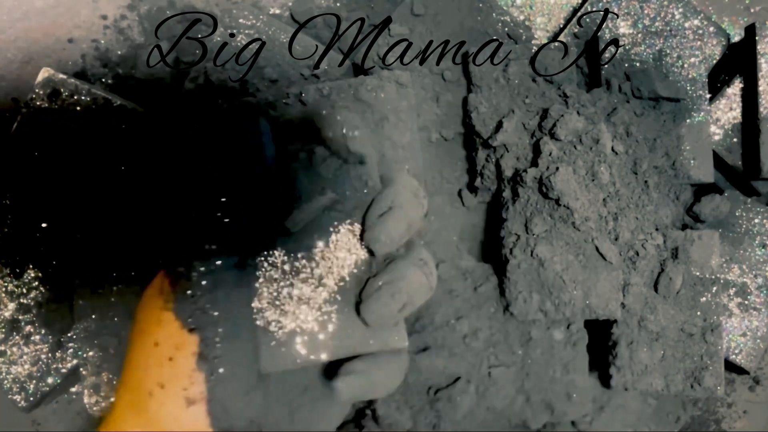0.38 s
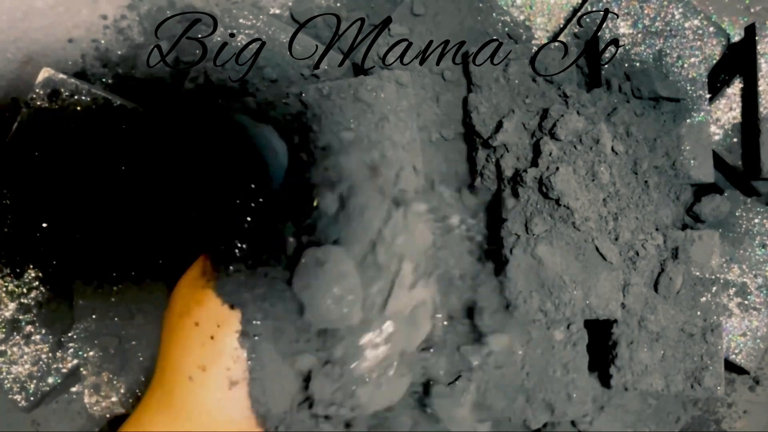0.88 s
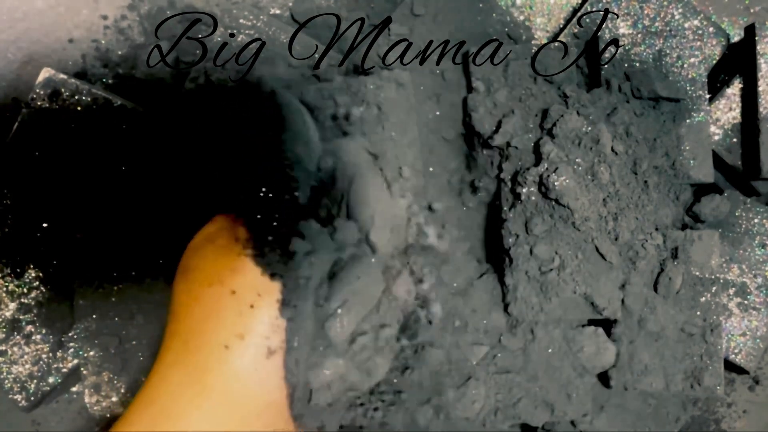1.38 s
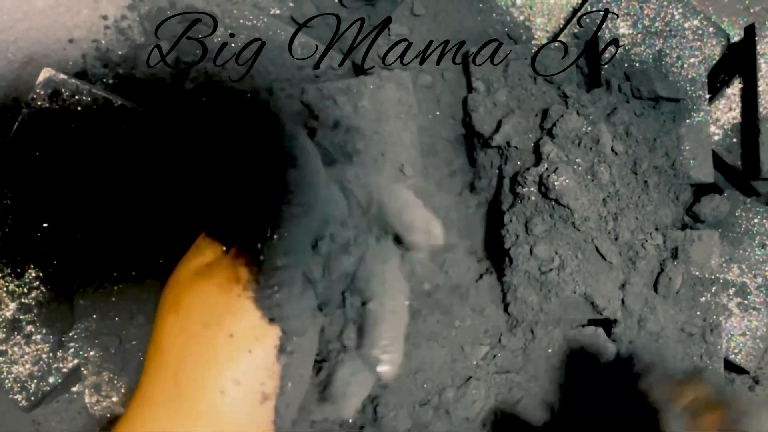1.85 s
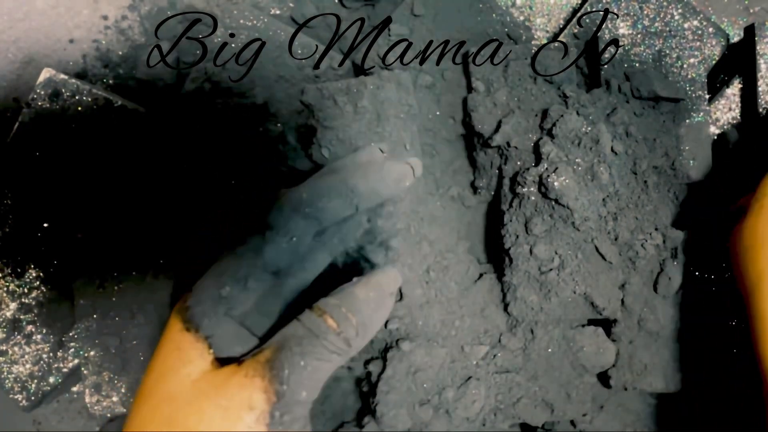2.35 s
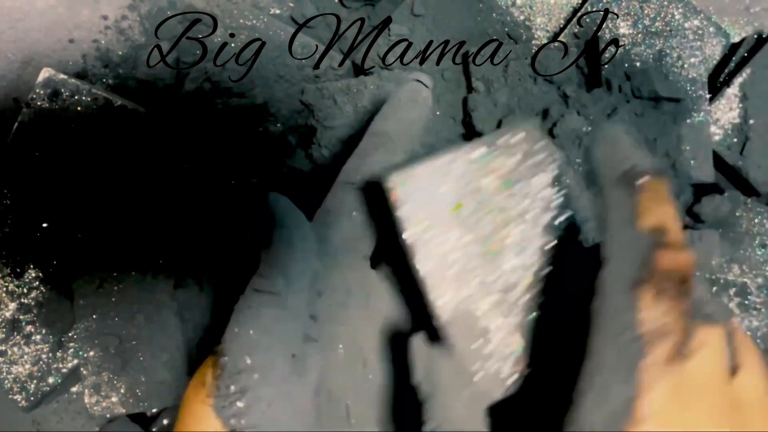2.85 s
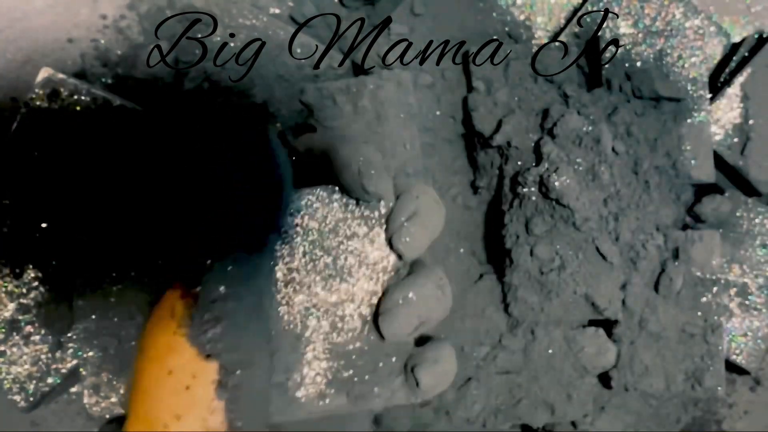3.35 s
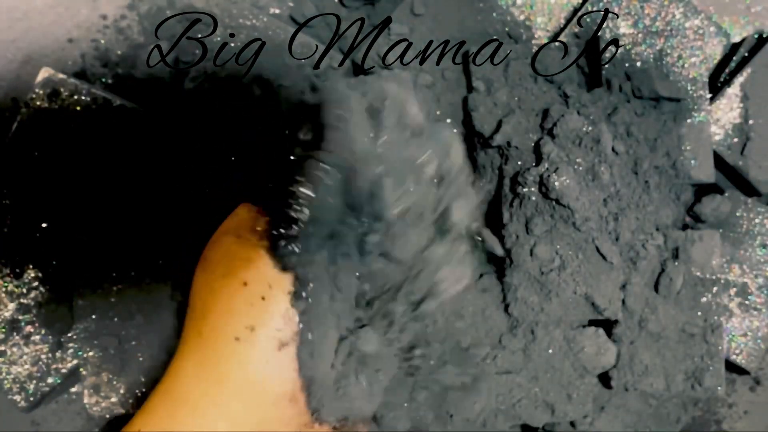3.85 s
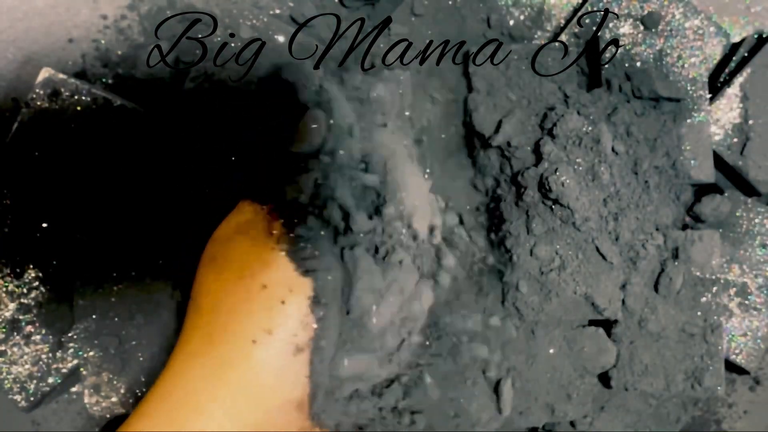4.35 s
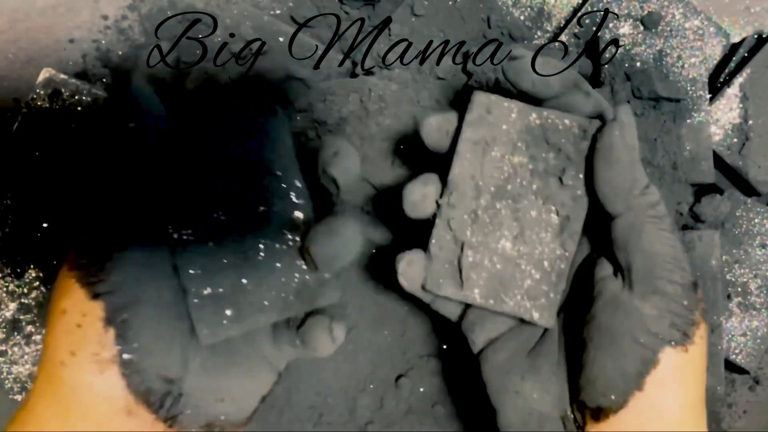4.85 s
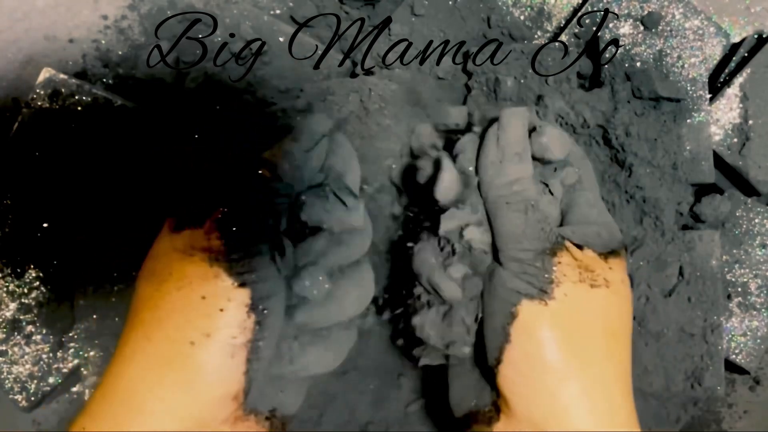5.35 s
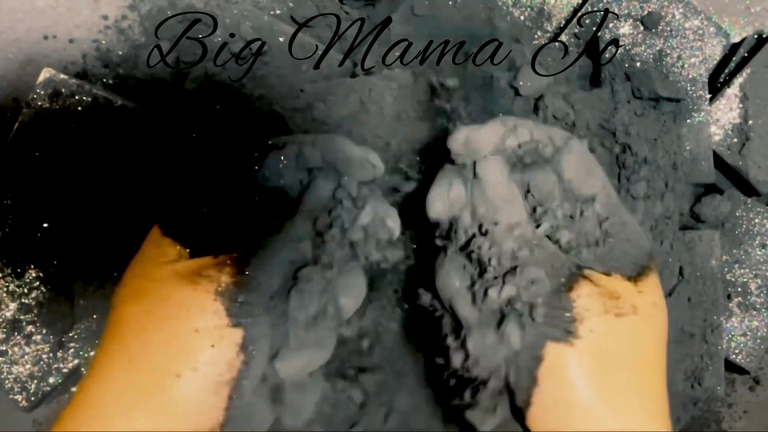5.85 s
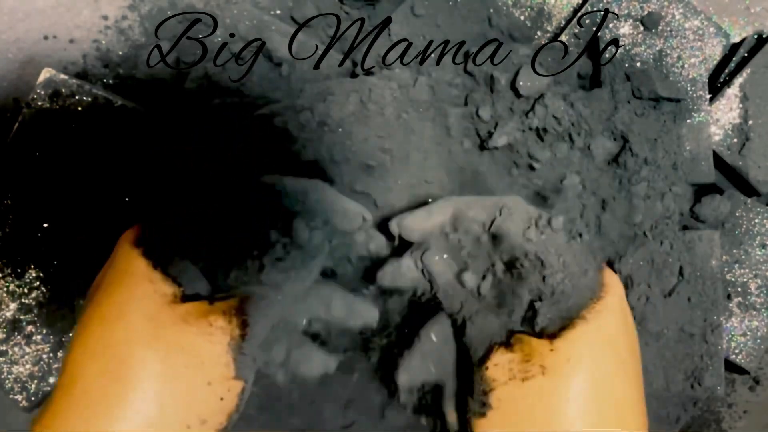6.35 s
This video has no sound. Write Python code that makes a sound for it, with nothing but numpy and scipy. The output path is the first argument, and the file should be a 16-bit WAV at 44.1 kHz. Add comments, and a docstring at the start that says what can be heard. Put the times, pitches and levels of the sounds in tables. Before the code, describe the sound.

Close, dry, single-channel sound of hands crushing powdery blocks over a tray, with faint steady hiss, a thin buzz and barely audible low shudder. Slight handling first, then at 0.3 s dull snaps and a scuff of shearing powder; crunches gather at 0.5-1.1 s with a soft thud at 0.85. Gritty kneading continues, with small snaps at 1.3 and 1.5 s, then thins out. A lone dull knock and thud fall at 2.4 s; skin rubs and squeaks faintly at 2.85. Crushing resumes at 3.26, with a loud crack and heavy tray thud at 3.42, then scattered snaps and crumbling until 4.45. The level drops abruptly at 4.76 and returns within a fraction of a second. From 5.0 s comes dense crackling and crunching, peaking with a hard bright crack at 5.81 and a dull snap at 5.9. A tiny squeak sounds at 6.2 before crumbs settle by 6.45.

```python
"""Dull snaps and dry crackling: hands crush soft powdery blocks over a tray, close to a small microphone.
Lumps ring for a few cycles, hard flakes crack, crumbs and grit crackle with the squeeze, the tray thuds.
Powder and skin rub as shaped noise, and a few grains squeak as short wavering tones.
The stand sways below hearing and shudders, and the electronics hiss and buzz faintly.
Once, the level drops suddenly and fades back in."""
import sys
import numpy as np
from scipy import signal
from scipy.fft import rfft, irfft, next_fast_len
from scipy.io import wavfile
from scipy.ndimage import uniform_filter1d

SR = 44100
rng = np.random.default_rng(int(sys.argv[2]) if len(sys.argv) > 2 else 0)


def to_wav(s):
    """Save 16-bit WAV."""
    ch = np.atleast_2d(s).T  # columns
    pcm = np.round(np.clip(ch, -1, 1) * 32767)  # PCM
    wavfile.write(sys.argv[1], SR, pcm.astype(np.int16))


def amplitude_ratio(level_db):
    """Convert a level in decibels to the matching linear amplitude (field) ratio."""
    exponent = np.asarray(level_db, float) / 20
    return 10 ** exponent


N = 284886  # samples in the scene

# how strongly crumbs of each pitch sound: pitch_hz, level_db (relative)
CRUMB_COLOUR = [(200, 1), (350, 3), (550, 4), (1000, 1.5), (1400, -10), (2200, -18), (4000, -31)]


def evened(x):
    """Scales a signal to an rms (average strength) of one."""
    return x / np.sqrt(np.mean(x ** 2) + 1e-20)


def read(points, hz):
    """Reads a level between the points of a spectrum table, along a log-frequency axis."""
    f, value = np.transpose(points)
    return np.interp(np.log(hz + 1), np.log(f + 1), value)


def curve(rows, column):
    """Turns one dB column of a timed table into a smooth gain for each sample."""
    rows = np.array(rows)
    return amplitude_ratio(np.interp(np.arange(N) / SR, rows[:, 0], rows[:, column]))


def noise(points):
    """Steady noise of unit rms with a given spectrum, silent outside the table."""
    size = next_fast_len(N)
    hz = np.fft.rfftfreq(size, 1 / SR)
    inside = (hz >= points[0][0]) & (hz <= points[-1][0])
    spectrum = rfft(rng.standard_normal(size)) * amplitude_ratio(read(points, hz)) * inside
    return evened(irfft(spectrum, size)[:N])


def ring(hz, t60, rise, phase=0):
    """A softly started tone that loses 60 dB in t60 seconds and stops there; phase is in turns."""
    t = np.arange(round(t60 * SR) + 2) / SR
    envelope = amplitude_ratio(-60 * t / t60) * (1 - np.exp(-t / rise))
    return envelope * np.sin(2 * np.pi * (hz * t + phase))


def stroke(db, rise, fall):
    """An envelope that swells in a straight line and dies away exponentially (times in s)."""
    t = np.arange(0, rise + 2 * fall, 1 / SR)
    return amplitude_ratio(db) * np.where(t < rise, t / rise, np.exp(-2 * (t - rise) / fall))


def add(mix, at, sound):
    """Mixes a sound in from sample at, cutting what runs past the end."""
    part = mix[at:][:len(sound)]
    part += sound[:len(part)]


def grains(colour, per_s, spread_db, cycles, clump_db, clump_s, count=24):
    """Small fractures at random, each a few cycles at one of count pitches, coming in clumps."""
    strength = amplitude_ratio(spread_db * np.minimum(rng.exponential(1, N), 4))
    strength *= rng.random(N) < per_s / SR
    drift = evened(uniform_filter1d(rng.standard_normal(N), round(clump_s * SR)))
    strength *= amplitude_ratio(clump_db * drift)
    kind = rng.integers(0, count, N)
    out = np.zeros(N)
    for k, hz in enumerate(np.geomspace(colour[0][0], colour[-1][0], count)):
        grain = ring(hz, cycles / hz, 0.17 / hz)[:2048]
        grain = amplitude_ratio(read(colour, hz)) * grain / np.linalg.norm(grain)
        out += signal.oaconvolve(strength * (kind == k), grain)[:N]
    return evened(out)


def electronics():
    """Preamplifier hiss and a faint train of clock pulses, heard as a comb of thin tones."""
    # hiss spectrum: pitch_hz, level_db (relative, per Hz)
    hiss_colour = [(24, -39), (40, -6.5), (75, -2), (155, -25), (312, -26.5), (433, -19.5), (990, -23),
                   (2440, -27), (5580, -28.5), (8130, -32.5), (10200, -31), (14800, -35), (16000, -31)]
    # level of the buzz tones along the spectrum: pitch_hz, level_db (rms)
    buzz_colour = [(500, -76), (4000, -74), (5500, -74), (7000, -79), (10000, -79), (15500, -79.5)]
    buzz_hz = 499.97
    t = np.arange(N) / SR
    buzz = np.zeros(N)
    for k in range(1, 32):
        buzz += amplitude_ratio(read(buzz_colour, k * buzz_hz)) * np.cos(2 * np.pi * k * buzz_hz * t)
    return amplitude_ratio(-48.5) * noise(hiss_colour) + np.sqrt(2) * buzz


def stand():
    """The microphone stand sways and shudders a little all along, and more around each jolt."""
    # slow sway spectrum: pitch_hz, level_db (relative, per Hz)
    sway_colour = [(2, -19), (6, 20), (12, 0), (20, -23)]
    # faster shudder spectrum: pitch_hz, level_db (relative, per Hz)
    shudder_colour = [(18, 3), (28, 8), (45, -3), (65, -24)]
    # jolts that reach the stand: peak_s, sway_db, shudder_db
    jolts = [(.25, -26, -35), (1.05, -43, -41), (1.35, -49, -37.5), (1.51, -54, -28), (1.75, -47, -45),
             (2.36, -46, -28.5), (2.58, -42, -57), (3.0, -62, -45), (3.441, -19, -24.5), (3.56, -37, -29.5),
             (4.12, -35, -43), (4.32, -26, -49), (4.73, -60, -47), (5.27, -21, -32.5), (5.65, -38, -30),
             (6.13, -52, -45), (6.44, -52, -38)]
    rise_s = 0.045
    sway, shudder = amplitude_ratio([[-34.5], [-48.5]]) * np.ones(N)  # levels at rest
    for s, sway_db, shudder_db in jolts:
        at = round((s - rise_s) * SR)
        add(sway, at, stroke(sway_db, rise_s, fall=0.2))
        add(shudder, at, stroke(shudder_db, rise_s, fall=0.176))
    return sway * noise(sway_colour) + shudder * noise(shudder_colour)


def squeaks():
    """A grain squeaks between skin and block: a short fuzzy whistle that starts fast and fades."""
    # the squeaks: start_s, length_s, pitch_hz, level_db
    squeak_list = [(2.853, 0.095, 2200, -52), (2.885, 0.038, 3780, -53), (4.89, 0.026, 2494, -49),
                   (5.372, 0.017, 2200, -44.5), (6.201, 0.028, 2230, -41.5), (6.203, 0.015, 4330, -38)]
    out = np.zeros(N)
    for s, length, hz, db in squeak_list:
        t = np.arange(0, length, 1 / SR)
        # a random walk of the phase, about 0.1 radian in 1 ms, makes the tone fuzzy
        wobble = .1 * np.cumsum(rng.standard_normal(len(t))) / np.sqrt(SR / 1000)
        envelope = amplitude_ratio(db) * np.sqrt(2) * np.sin(np.pi * (t / length) ** 0.42)
        add(out, round(s * SR), envelope * np.sin(2 * np.pi * hz * t + wobble))
    return out


def scuffs():
    """Shearing powder and rubbing skin: bursts of noise and crumbs that flutter as grains slip."""
    # powder shears under a palm: start_s, rise_s, fall_s, crumbs_db, fizz_db
    shears = [(.335, 0.013, 0.074, -28.5, -39), (.475, .044, .067, -39.5, -50),
              (.775, .013, 0.054, -33.5, -62), (.844, 0.0065, 0.024, -23, -49),
              (.87, 0.012, 0.18, -40, -69), (.995, 0.024, 0.05, -37.5, -48),
              (1.5, 0.0065, 0.059, -34.5, -55), (3.261, 0.035, .05, -28, -34),
              (3.39, .015, 0.021, -32, -43), (3.414, 0.0021, 0.028, -22, -31.5),
              (3.439, .0085, 0.097, -35.5, -47), (3.896, 0.012, 0.071, -43, -45),
              (4.189, 0.0046, 0.058, -33.5, -49), (4.704, 0.022, 0.026, -37.5, -66),
              (4.994, 0.051, 0.057, -30, -35.5), (5.158, 0.026, 0.076, -33, -44.5),
              (5.235, 0.041, 0.043, -36, -44), (5.405, 0.01, 0.033, -37.5, -60),
              (5.62, 0.045, 0.084, -29, -42.5), (5.716, 0.0066, 0.025, -36, -49),
              (5.816, .0047, .06, -35, -38), (5.9, 0.011, 0.062, -35, -66),
              (6.075, 0.0091, 0.056, -36.5, -45), (6.37, 0.026, 0.096, -49, -47)]
    # dry skin rubs on a block: start_s, fall_s, level_db
    rubs = [(.26, 0.051, -51), (1.365, .035, -54), (1.497, 0.028, -45), (2.24, 0.08, -50), (2.36, .04, -54),
            (2.844, 0.036, -42), (2.875, 0.043, -47), (4.885, 0.068, -44.5), (4.94, 0.12, -53),
            (5.37, .015, -46), (6.075, 0.036, -54), (6.16, 0.007, -39)]
    # powder fizz spectrum: pitch_hz, level_db (relative, per Hz)
    fizz_colour = [(900, 11), (1600, 6.5), (3000, 1.5), (4500, -4), (7000, -17), (10000, -12), (15500, -39)]
    # skin rub spectrum: pitch_hz, level_db (relative, per Hz)
    rub_colour = [(1500, -5.5), (2300, -1), (3000, -10.5), (5300, -9), (6800, -1.5), (8200, -14.5),
                  (15500, -12)]
    fizz, rub, crumbs = np.zeros((3, N))
    for s, rise, fall, crumbs_db, fizz_db in shears:
        add(fizz, round(s * SR), stroke(fizz_db, rise, fall))
        add(crumbs, round(s * SR), stroke(crumbs_db, rise, fall))
    for s, fall, db in rubs:
        add(rub, round(s * SR), stroke(db, 0.33 * fall, fall))
    rub += np.sqrt(0.1) * fizz  # shearing also brings some skin rub, 10 dB under its fizz
    drift = evened(uniform_filter1d(rng.standard_normal(N), size=120))
    flutter = evened(amplitude_ratio(2.0 * drift))
    breaking = grains(CRUMB_COLOUR, 2000, spread_db=2.5, cycles=10.6, clump_db=3.5, clump_s=0.011)
    return flutter * (fizz * noise(fizz_colour) + rub * noise(rub_colour)) + crumbs * breaking


def tray(push):
    """The tray's low modes (its natural tones) answer any push."""
    # modes of the tray: pitch_hz, level_db, t60_s (time to lose 60 dB)
    tray_modes = [(95.6, -29, 0.41), (163.4, -2, 0.12), (204, -16, 0.05)]
    out = np.zeros(N)
    for hz, db, t60 in tray_modes:
        out += amplitude_ratio(db) * signal.oaconvolve(push, ring(hz, t60, 0.0019))[:N]
    return out


def crumble():
    """Crumbs, fine grit and the kneading that reaches the tray follow the squeeze of the hands."""
    # the squeeze: time_s, crumbling_db, push_on_tray_db
    squeeze = [(0.0, -55, -52.5), (.45, -47, -46), (.75, -44, -54), (.95, -40.5, -32), (1.11, -46.5, -46.5),
               (1.58, -48, -49), (2.25, -56, -52.5), (2.41, -52.5, -34.5), (2.61, -57, -52.5),
               (3.13, -51.5, -57), (3.44, -49.5, -34.5), (3.72, -46, -51), (4.32, -45.5, -51.5),
               (4.95, -56.5, -53.5), (5.22, -41, -46.5), (5.6, -39.5, -53), (6.06, -40.5, -38),
               (6.46, -49, -52)]
    # how strongly grit of each pitch sounds: pitch_hz, level_db (relative)
    grit_colour = [(1300, -2), (2200, -2.5), (3500, -3.5), (5000, -8), (6800, -3.5), (9000, -9.5),
                   (15000, -32)]
    crumbs = grains(CRUMB_COLOUR, 1500, spread_db=3.0, cycles=9.8, clump_db=2.5, clump_s=0.018)
    grit = grains(grit_colour, 5000, spread_db=1.5, cycles=6.1, clump_db=1.5, clump_s=0.0056)
    tray_part = 0.14 * evened(tray(rng.standard_normal(N)))
    kneading = evened(tray_part + noise([(55, -4), (100, 0.0), (200, -6.0), (330, -11.0)]))
    crumbling = curve(squeeze, column=1)
    # grit grows less steeply with the squeeze than the crumbs do
    grit_gain = amplitude_ratio(-30.5) * crumbling ** 0.51
    return crumbling * crumbs + grit_gain * grit + curve(squeeze, column=2) * kneading


def crack(db, hz, puff):
    """The split is a puff of a few ms that rings a hard flake, softly enough to spare the treble."""
    # modes of a hard flake: multiple (times the crack's pitch), level_db (relative)
    flake_modes = [(.75, 9), (1.049, 10.5), (1.5, -4)]
    t = np.arange(len(puff)) / SR
    split = puff * (1 - np.exp(-t / 0.00014)) * np.exp(-t / 0.002)
    out = np.zeros(2 * len(t))
    for multiple, mode_db in flake_modes:
        flake_hz = hz * multiple
        flake_ring = ring(flake_hz, 6 / flake_hz, .5 / flake_hz)  # six cycles long
        add(out, 0, amplitude_ratio(mode_db) * np.convolve(split, flake_ring))
    return amplitude_ratio(db) * out / abs(out).max()


def snaps():
    """Breaking blocks: dull rings of lumps, short bright cracks of flakes and blows to the tray."""
    # lumps that break with a dull ring: start_s, level_db, pitch_hz
    lumps = [(.335, -23.5, 655), (.365, -27, 490), (.477, -28, 520), (.508, -23, 640), (.579, -30, 347),
             (.628, -31, 940), (.718, -27, 720), (.786, -25, 504), (.814, -24, 457), (.85, -19.5, 352),
             (.858, -20, 374), (.968, -34, 477), (.997, -20.5, 736), (1.009, -25, 590), (1.061, -30, 585),
             (1.331, -26.5, 394), (1.503, -22, 634), (1.517, -23.5, 790), (2.401, -19, 650),
             (3.265, -27, 486), (3.295, -20.5, 390), (3.402, -23, 690), (3.421, -9.5, 487),
             (3.646, -29, 920), (3.697, -22.5, 684), (3.895, -21.5, 325), (3.999, -28, 885),
             (4.061, -20.5, 414), (4.089, -25.5, 825), (4.187, -18, 880), (4.308, -16.5, 383),
             (4.451, -30, 715), (4.883, -28, 467), (5.02, -28, 685), (5.037, -18.5, 495),
             (5.049, -17.5, 706), (5.158, -22.5, 850), (5.177, -23, 736), (5.205, -22, 384),
             (5.238, -22, 900), (5.259, -28, 645), (5.384, -18, 402), (5.404, -17, 525), (5.492, -23, 710),
             (5.633, -15, 460), (5.655, -20, 710), (5.77, -28.5, 413), (5.811, -9.5, 850),
             (5.896, -10, 510), (5.922, -18, 497), (6.018, -20, 570), (6.076, -20.5, 500),
             (6.085, -31, 630), (6.146, -31, 666), (6.163, -26, 337), (6.203, -21.5, 450)]
    # modes of a lump: multiple (times its pitch), level_db (added to the lump's)
    lump_modes = [(1.0, 3), (.68, -8), (1.6, -8)]
    # hard flakes that crack off: start_s, level_db (peak of the ringing flake), pitch_hz
    flakes = [(0.283, -36, 4000), (.335, -33, 3600), (0.349, -28.5, 2870), (.628, -34, 1800),
              (.85, -37, 2600), (.931, -31.5, 2870), (1.05, -31, 3200), (1.496, -32, 5340),
              (1.503, -34, 3620), (1.517, -28, 2880), (2.85, -31.5, 4200), (2.881, -30, 5270),
              (3.286, -36, 3300), (3.296, -40, 3720), (3.418, -17, 2230), (3.698, -38, 2980),
              (3.894, -34, 3020), (3.998, -30.5, 2400), (4.089, -26.5, 2350), (4.187, -20.5, 1870),
              (4.306, -34.5, 1930), (4.899, -28, 4170), (5.02, -31, 2420), (5.037, -31, 3200),
              (5.159, -34.5, 2550), (5.178, -27, 3070), (5.335, -37, 3500), (5.383, -32, 2540),
              (5.626, -28, 1850), (5.656, -27.5, 1830), (5.683, -30, 2100), (5.72, -26.5, 2050),
              (5.811, -8, 2280), (6.076, -36, 4600), (6.085, -38, 2400), (6.146, -34, 2500),
              (6.204, -21.5, 3970)]
    # splinter noise spectrum: pitch_hz, level_db (relative, per Hz)
    splinter_colour = [(900, 19), (2000, 3), (4000, -2), (7000, -8), (10000, -25), (15500, -28)]
    # blows to the tray: start_s, level_db (of the push)
    thuds = [(0.336, -27), (0.849, -18.5), (.858, -13), (0.966, -29), (1.062, -25.5), (1.33, -32),
             (2.4, -19.5), (3.29, -23.5), (3.418, -3.5), (3.697, -23), (4.31, -21), (4.451, -32.5),
             (5.035, -22), (5.206, -32), (5.654, -30), (5.736, -30), (5.896, -33), (6.018, -26),
             (6.163, -38)]
    out, splinters, blows = np.zeros((3, N))
    chips = []
    for s, db, hz in lumps:
        for multiple, mode_db in lump_modes:
            mode_hz = hz * multiple
            t60 = 0.01 + 4.7 / mode_hz  # higher modes die sooner
            sound = ring(mode_hz, t60, rise=.0009, phase=rng.random())
            add(out, round(s * SR), amplitude_ratio(db + mode_db) * sound)
        # every lump also sheds a small flake, 27 dB under it, at a scattered pitch
        chips.append((s, db - 27, 2920 * np.exp(0.51 * rng.uniform(-1, 1))))
    fade = np.exp(-np.arange(600) / SR / .0008)
    for s, db, hz in flakes + chips:
        add(out, round(s * SR), crack(db, hz, rng.standard_normal(600)))
        add(splinters, round(s * SR), amplitude_ratio(db - 11) * fade)
    for s, db in thuds:
        blows[round(s * SR)] = amplitude_ratio(db)
    return out + splinters * noise(splinter_colour) + tray(blows)


def scene():
    """All sources add up at the microphone, as one channel."""
    return (electronics() + stand() + squeaks() + scuffs() + crumble() + snaps())[None]


def top_cut(x):
    """Nothing passes above the cut-off."""
    return signal.sosfilt(signal.butter(12, 16620, fs=SR, output="sos"), x)


def record(dry):
    """The level drops to about a tenth at 4.757 s and fades back in; the top treble is cut off."""
    since = np.arange(N) / SR - 4.757
    fade = np.where(since < 0, 1, np.clip(.11 + since / .065, 0, 1))  # full again after 58 ms
    edge = signal.firwin(511, 15830, window=("kaiser", 9), fs=SR)  # low-pass edge in Hz
    finished = signal.oaconvolve(dry * fade, edge[None], "same")
    return top_cut(finished)


dry = scene()
out = record(dry)
to_wav(out)
```